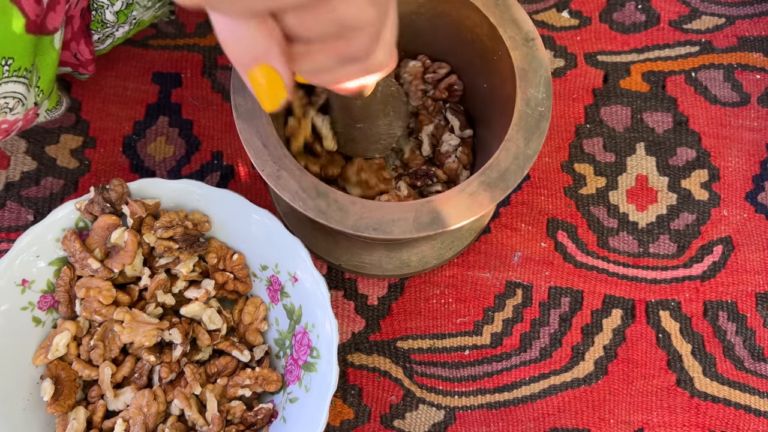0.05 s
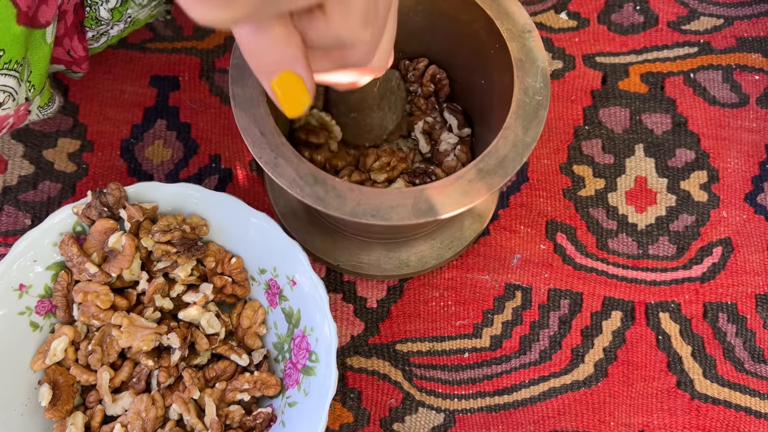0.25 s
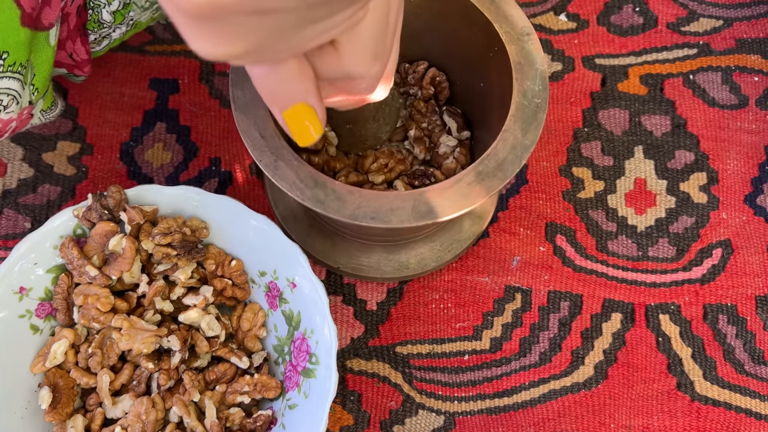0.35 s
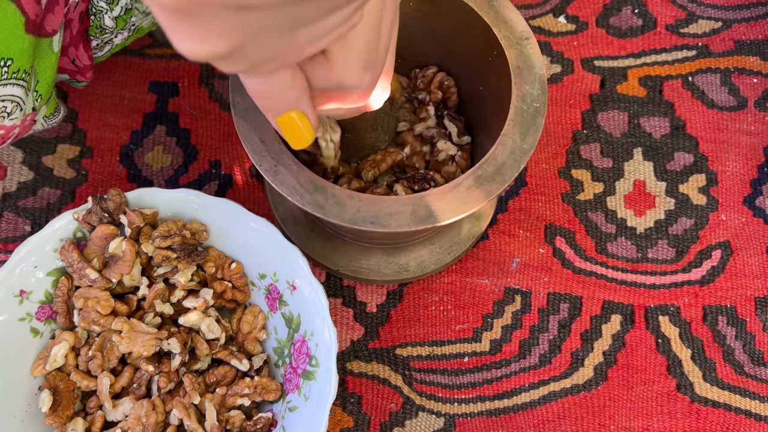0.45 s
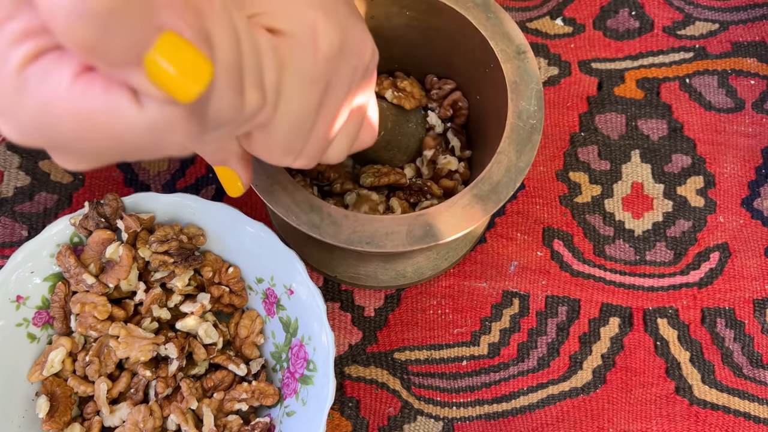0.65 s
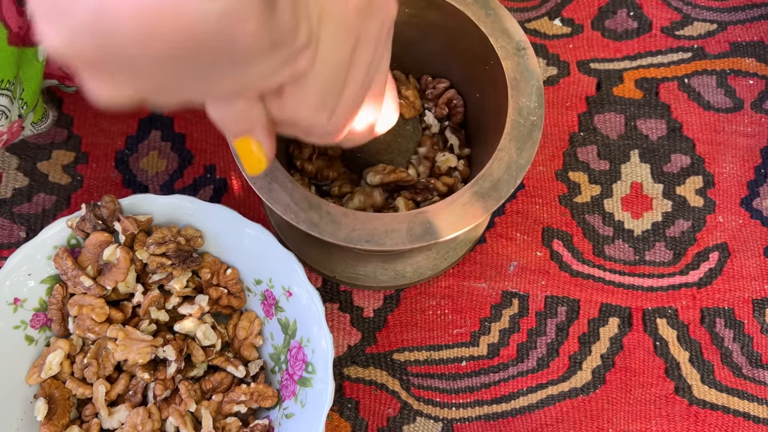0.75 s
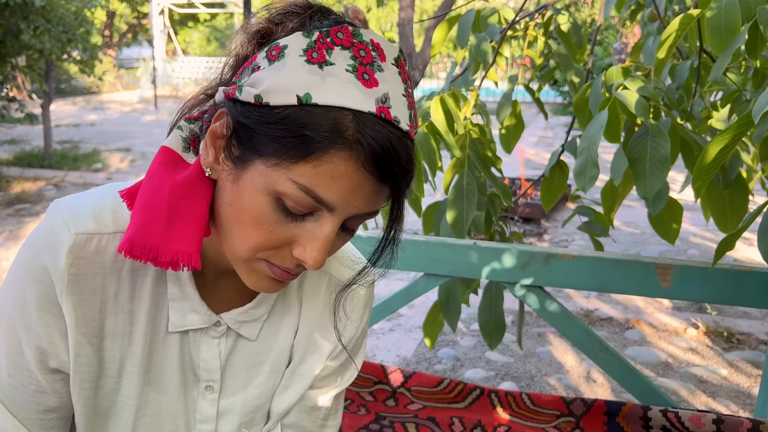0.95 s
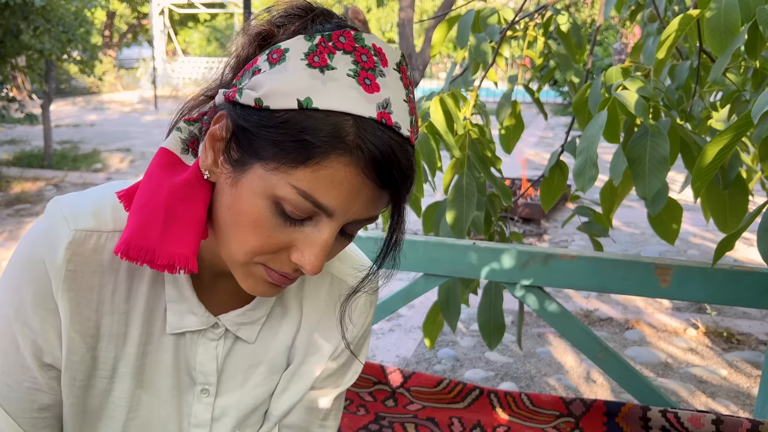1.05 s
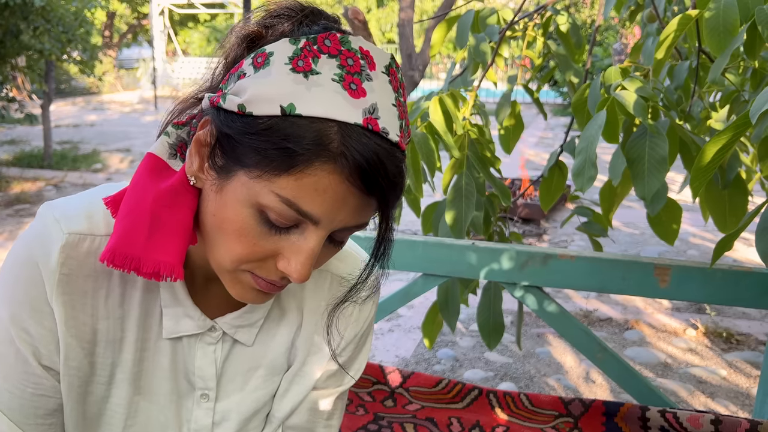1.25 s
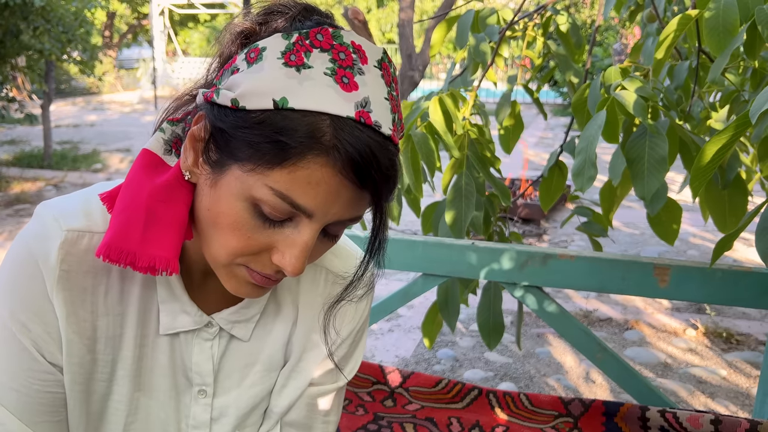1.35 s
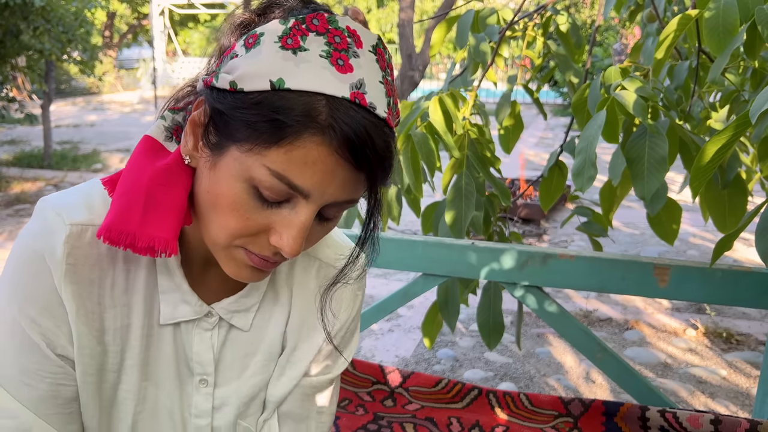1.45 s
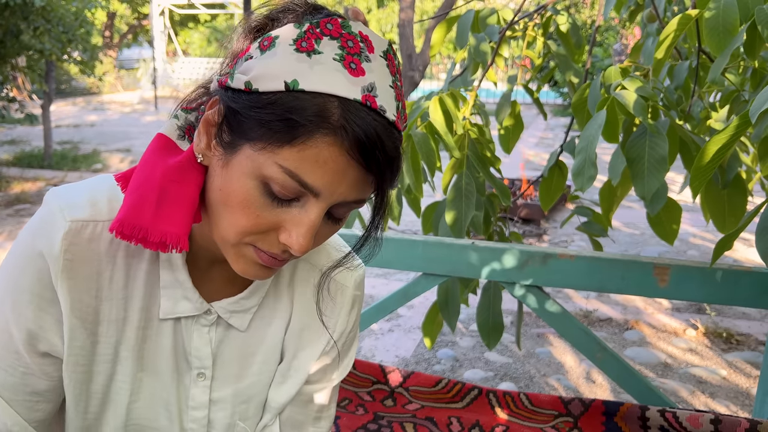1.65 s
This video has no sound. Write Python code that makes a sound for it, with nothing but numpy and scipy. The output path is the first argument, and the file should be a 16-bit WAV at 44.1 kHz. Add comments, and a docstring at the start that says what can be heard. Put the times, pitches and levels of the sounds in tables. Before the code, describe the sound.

A pestle grinds nuts in a brass mortar, close up outdoors: faint taps, one hard ringing clang, dull thumps with dense dry cracking, sharp lighter clinks, then woody knocks over a quiet low rumble.

```python
"""A low rumble and air hiss lie under a pestle working nuts in a brass mortar on a carpet outdoors.
Light wall taps (beating pairs of damped sines) and cracks (swarms of sine grains) come first, then one hard
clang with a noisy chatter at 0.23 s. Dull thumps (low damped sines) start at 0.32 s, many kernels crack
from 0.4 to 0.6 s, and lighter taps with short sharp ticks follow near 0.87 and 0.96 s.
Two groups of wooden knocks (damped sines with a rough chirp) come late, near 1.38 and 1.48 s."""
import sys
import numpy as np
from scipy import signal
from scipy.fft import rfft, irfft, next_fast_len
from scipy.io import wavfile
from scipy.ndimage import map_coordinates

SR = 44100
rng = np.random.default_rng(int(sys.argv[2]) if len(sys.argv) > 2 else 0)


def int16_out(signal):
    """Quantize to a 16-bit WAV file."""
    q = np.round(np.clip(np.atleast_2d(signal).T, -1, 1) * 32767)
    wavfile.write(sys.argv[1], SR, q.astype(np.int16))


def nominal_scale(level):
    """Amplitude ratio for a level in decibels (scalar or array-like)."""
    x = np.asarray(level, float) / 20
    return 10 ** x


N = 74970  # length in samples, 1.7 s


def unit(x):
    """Scale to rms 1."""
    return x / np.sqrt(np.mean(x ** 2) + 1e-20)


def along(points, hz):
    """Read a curve of (Hz, value) points on a logarithmic pitch axis."""
    point_hz, value = np.transpose(points)
    return np.interp(np.log(hz + 1), np.log(point_hz + 1), value)


def over_time(points):
    """Read a curve of (seconds, value) points at every sample."""
    return np.interp(np.arange(N) / SR, *np.transpose(points))


def wobble(rate):
    """A smooth random curve with `rate` random knots a second."""
    knots = rng.standard_normal(int(N * rate / SR) + 4)
    return map_coordinates(knots, [np.arange(N) * rate / SR])


def filtered(x, response):
    """Multiply the spectrum of x by a response that depends on frequency."""
    size = next_fast_len(N + 8192)
    spectrum = rfft(x, size) * response(np.fft.rfftfreq(size, 1 / SR))
    return irfft(spectrum, size)[..., :N]


def rush(spectrum, alike):
    """Stereo noise of rms 1; likeness 1 makes both sides equal, 0 makes them unrelated."""
    def mid_side(hz):
        turn = np.arccos(np.clip(along(alike, hz), -1, 1)) / 2
        return nominal_scale(along(spectrum, hz)) * [np.cos(turn), np.sin(turn)]

    mid, side = filtered(rng.standard_normal((2, N)), mid_side)
    return unit(np.array([mid + side, mid - side]))


def ring(start_s, hz, t60, rise_s, turns=0.):
    """A sine that swells in over rise_s and loses 60 dB in t60 seconds; turns is its starting phase."""
    t = np.maximum(np.arange(N) / SR - start_s, 0)
    wave = np.sin(2 * np.pi * (hz * t + turns))
    return wave * nominal_scale(-60 * t / abs(t60)) * (1 - np.exp(-t / abs(rise_s)))


def grains(start_s, level_db, hz):
    """Many short damped sines, each added at its own time; lower ones last longer."""
    k = np.arange(96)
    cycles = hz[:, None] * k / SR
    decay = np.exp(-3 * cycles / 1.8)  # falls by e cubed in 1.8 cycles
    wave = nominal_scale(level_db)[:, None] * np.sin(2 * np.pi * cycles) * decay
    at = np.clip(np.round(start_s * SR).astype(int)[:, None] + k, 0, N)
    return np.bincount(at.ravel(), wave.ravel(), N + 1)[:N]


# colour of the rumble before scaling to rms 1: pitch_hz [Hz], level_db [dB]
RUMBLE_COLOUR = [(12, -69), (25, -20), (95, 2.5), (180, -11), (300, -15), (450, -17.5), (750, -21.5),
                 (1100, -24.5), (1600, -28.5), (3000, -79)]
# average loudness of the rumble: time_s [s], level_db [dB]
RUMBLE_LEVEL = [(0.0, -53), (0.344, -50.5), (1.182, -55.5), (1.524, -51.5), (1.7, -55.5)]
# how alike the rumble is left and right: pitch_hz [Hz], likeness [0 to 1]
RUMBLE_LIKENESS = [(60, 0.96), (150, 0.87), (300, 0.17), (700, 0.074)]


def rumble():
    """Low noise with a slowly drifting, slightly uneven loudness."""
    level_db = over_time(RUMBLE_LEVEL) + 1.5 * wobble(11.46)
    return nominal_scale(level_db) * rush(RUMBLE_COLOUR, RUMBLE_LIKENESS)


# colour of the hiss before scaling to rms 1: pitch_hz [Hz], level_db [dB]
HISS_COLOUR = [(760, -60.5), (1300, -26), (1800, 2.5), (3000, 2), (5000, 2.5), (8500, 1), (12000, -11),
               (16000, -5.5)]
# how alike the hiss is left and right: pitch_hz [Hz], likeness [0 to 1]
HISS_LIKENESS = [(1500, 0.11), (6000, 0.099), (14000, 0.19)]
# strength of the grinding, shared by hiss and crumbs, which each add 3 dB: time_s [s], level_db [dB]
GRINDING = [(0, -61), (.12, -58), (.21, -59.5), (.34, -59.5), (.45, -58.5), (.62, -54), (.69, -63.5),
            (.80, -62), (.9, -69), (1.03, -68.5), (1.15, -66), (1.27, -68.5), (1.37, -56.5), (1.44, -72),
            (1.55, -60.5), (1.62, -72), (1.7, -75.5)]


def hiss():
    """Airy noise that rises and falls with the grinding and flickers a little."""
    level_db = over_time(GRINDING) + 3 + 1.5 * wobble(40.22)
    return nominal_scale(level_db) * rush(HISS_COLOUR, HISS_LIKENESS)


def yard(x):
    """A short diffuse answer from nearby surfaces: the sound smeared by fading noise."""
    t = np.arange(SR // 5) / SR
    tail = rng.standard_normal((2, len(t))) * nominal_scale(-60 * t / 0.027)  # 60 dB down in 0.027 s
    return signal.fftconvolve(x[None], tail / np.linalg.norm(tail[0]), axes=1)[:, :N]


# the mortar thumps the carpeted floor: start_s [s], level_db [dB], pitch_hz [Hz], t60_s [s to fall 60 dB]
FLOOR_THUMPS = [(0.317, -29, 79, 0.068), (0.427, -22, 154, 0.019), (0.457, -25, 81, 0.093),
                (0.609, -28.5, 79, 0.1), (0.654, -32, 84, 0.093), (0.712, -28, 79, 0.052),
                (1.384, -18.5, 114, 0.03), (1.488, -35, 116, 0.012)]


def thumps():
    """Soft low sines that swell gently and die quickly."""
    return sum(nominal_scale(db) * ring(s, hz, t60, 0.0074) for s, db, hz, t60 in FLOOR_THUMPS)


# wooden knocks: start_s [s], level_db [dB]
WOOD_KNOCKS = [(1.378, -26.5), (1.3852, -32.5), (1.414, -42), (1.469, -47), (1.4843, -35.5)]
# tones in every knock: pitch_hz [Hz], level_db [dB, added to the knock], t60_s [s to fall 60 dB]
WOOD_TONES = [(713, 0.5, 0.04), (787, -1.5, 0.025), (1202, -6.5, 0.025), (191, -2.5, 0.034)]
# rough chirps around the knocks: middle_s [s], level_db [dB]
KNOCK_CHIRPS = [(1.384, -42.5), (1.484, -49.5)]


def wooden_knocks():
    """Each knock sounds a few short wooden tones; two bursts of narrow noise roughen them."""
    t = np.arange(N) / SR
    chirp_hz, width_hz, length_s = 4100, 320, 0.0088
    wood = np.zeros(N)
    for s, db in WOOD_KNOCKS:
        for hz, level_db, t60 in WOOD_TONES:
            wood += nominal_scale(db + level_db) * ring(s, hz, t60, 0.0018)
    noise = rng.standard_normal(N)
    chirp = unit(filtered(noise, lambda hz: np.exp(-((hz - chirp_hz) / width_hz) ** 2)))
    bursts = sum(nominal_scale(db) * np.exp(-((t - s) / length_s) ** 2) for s, db in KNOCK_CHIRPS)
    return wood + chirp * bursts


# kernels cracking: start_s [s], swarm_db [dB], snap_db [dB over the swarm, before fixed offsets],
# spread_s [s, scatter of the splinters], pitch_hz [Hz, middle of the scatter]
KERNEL_CRACKS = [(.030, -42, -7, .004, 3820), (0.054, -37, 12, 0.0049, 8740),
                 (0.1027, -41.5, 8, 0.0016, 11400), (0.378, -43.5, 3, 0.001, 14200),
                 (0.395, -50, 21, 0.002, 10200), (0.413, -37.5, 7, 0.013, 7970),
                 (0.418, -28, 14, .004, 9400), (0.478, -49, 5, 0.0018, 10000),
                 (0.497, -62, -4, 0.0026, 11000), (0.529, -48, 7, .003, 10800),
                 (0.5477, -38.5, 13.5, 0.0023, 12100), (0.5552, -39, -5, 0.002, 11300),
                 (0.5612, -32, 22, 0.003, 11000), (0.5732, -47, 22.5, 0.00068, 12200),
                 (0.5925, -38.5, 15.5, 0.0034, 10500), (0.66, -36, 17.5, 0.0031, 8100),
                 (0.804, -48, 11, 0.0043, 2450), (1.0742, -38.5, -9, 0.0038, 6500),
                 (1.122, -45.5, 13, 0.0079, 11100), (1.144, -52, 3, 0.0039, 5970),
                 (1.166, -47, 8, 0.0021, 6170), (1.209, -51, 3, 0.0022, 4660),
                 (1.2576, -48.5, 1, 0.0017, 9100), (1.640, -54, 7.5, 0.004, 8800)]


def cracks(count=70):
    """A breaking kernel gives one sharp snap, four grains close together, in a swarm of splinters."""
    start_s, swarm_db, snap_db, spread_s, middle_hz = (c[:, None] for c in np.transpose(KERNEL_CRACKS))
    late, pitch, size = rng.standard_normal((3, len(KERNEL_CRACKS), count))
    splinter = np.arange(count) > 3
    when = start_s + np.abs(late) * np.where(splinter, spread_s, 0.00015)
    level_db = swarm_db + np.where(splinter, 6 * size - 2, snap_db - 6)
    level_db = level_db + 1.8 * pitch  # higher grains are louder
    hz = np.clip(middle_hz * np.exp(0.6 * pitch), 900, 15000)
    return grains(when.ravel(), level_db.ravel(), hz.ravel())


def crumbs(count=900):
    """Small crumbs snap at random times, as loud as the grinding makes them; a few are much louder."""
    when, tone, big = rng.random((count, 3)).T
    when_s = when * N / SR
    level_db = np.interp(when_s, *np.transpose(GRINDING)) + 3 - 4 * np.log(big)
    return grains(when_s, level_db, 3000 * 4.9 ** tone)


# short sharp ticks: start_s [s], level_db [dB]
SHARP_TICKS = [(0.8696, -28.5), (0.9612, -35.5), (0.9698, -19)]


def ticks():
    """Each tick is one very short damped sine at 2440 Hz."""
    start_s, level_db = np.transpose(SHARP_TICKS)
    return grains(start_s, level_db, 2440 + 0 * start_s)


def crunch():
    """Cracks and crumbs lose their lows below about 1330 Hz; the ticks stay whole."""
    nuts = cracks() + crumbs()
    return filtered(nuts, lambda hz: (1j * hz / (1330 + 1j * hz)) ** 2) + ticks()


# colour of the chatter before scaling to rms 1: pitch_hz [Hz], level_db [dB]
CHATTER_COLOUR = [(150, -100), (280, -16), (600, -6.5), (1200, -11), (2000, -12), (3000, -16.5),
                  (5000, -23), (9000, -20.5), (12000, -38.5), (16000, -38.5)]
# lowest wall tone while the pestle leans on it: pitch_hz [Hz], level_db [dB, left],
# t60_s [s to fall 60 dB], end_s [s after the start, sign ignored; the tone has faded by then]
FADING_RING = (1175.5, -14.5, 0.22, -0.66)


def chatter():
    """The pestle stays on the wall after the hard blow: rough noise and one quickly fading ring."""
    start_s, slow_s, fast_t60 = 0.2335, 0.059, 0.0096
    t = np.arange(N) / SR - start_s
    # a fall of 220 dB a second at first, then a much faster one
    fall_db = -220 * np.clip(t, 0, slow_s) - 60 * np.maximum(t - slow_s, 0) / fast_t60
    shape = (t > 0) * nominal_scale(fall_db + 0.67 * wobble(160))
    noise = nominal_scale(-29.5) * shape * rush(CHATTER_COLOUR, [(1000, 0.28)])
    hz, db, t60, end_s = FADING_RING
    ending = 1 / (1 + np.abs(t / end_s) ** 8)
    return noise + nominal_scale([[db], [db - 3.5]]) * ring(start_s, hz, t60, 0.0052) * ending


# wall tones come in split pairs: lower_hz [Hz], split_hz [Hz from lower to upper]
WALL_PAIRS = [(1162.5, 11.3), (2724.5, 12.2), (4095, 6.5), (4929, 15), (5614, 13), (6536, 9), (6748, 9),
              (7074, 8), (7865, 9), (8431, 12), (11760, 12), (12492, 9)]
# for each pair: level_db [dB], t60_s [s to fall 60 dB], upper_db [dB, upper over lower],
# left_db [dB, left over right, before the extras]
WALL_RING = [(0.5, 0.79, 0.5, 8.5), (3.5, 0.83, -1, 9), (-8, 0.68, 8.5, 12.5), (2.5, 0.35, -12.5, 11),
             (-7, 0.45, -1.5, 8), (-1.5, 0.24, -12.5, 10.5), (-23.5, 0.17, 8.5, -8.5),
             (-8.5, 0.24, -22, 18.5), (-21.5, 0.16, -9, -14), (-8, 0.092, 9.5, 9), (-31.5, 0.27, 1, 2.5),
             (-23.5, 0.27, -26, 7)]
# swing direction for each pair: upper [+1 or -1], right side of lower [+1 or -1], right side of upper [+1 or -1]
WALL_SIGNS = [(1, 1, -1), (-1, -1, -1), (-1, 1, 1), (-1, 1, 1), (-1, -1, -1), (-1, 1, 1)] + 6 * [(1, 1, 1)]
# extra left lean of the upper partner: lowest pair [dB], second pair [dB]
UPPER_LEAN = (-1.5, 7)
# blows on the wall: start_s [s], level_db [dB], tilt_db [dB per octave],
# three leans to the upper partner [dB: lowest pair, second, higher],
# three starts of the beat [turns: lowest pair, second, higher],
# two extra left leans [dB: lowest pair, others], build_s [s, build-up of all but the lowest pair]
WALL_BLOWS = [(0.032, -53, 0.5, -2, 1, -0.5, -0.055, .01, .01, -6, -4, 0.0038),
              (0.122, -51, -19, -4, 16, 20, 0.7, .01, .01, -9, -26, .003),
              (0.234, -24.5, 1.66, 3.5, -8, 1.2, 0.095, 0.61, 0.0056, -1.8, -4, 0.027),
              (0.658, -57.5, 2.5, 9, 23, 24, 0.38, 0.0089, .01, 5, 18, 0.0012),
              (0.8671, -48, -7, -7, 20, -1, -0.098, .01, 0.0086, -7.5, -10.5, 0.001),
              (0.9612, -30.5, -9.5, 0.5, 20, 1.5, -0.34, 0.59, 0.38, 1.5, 5.5, 0.00034),
              (1.543, -71.5, 7.5, -12, -18, -15.5, 1, .01, 0.0095, 8, 23, 0.0035)]
# the pestle sinks into the nuts and changes the ring: start_s [s], second_db [dB lost by the second pair,
# a negative loss is a gain], higher_db [dB per octave lost by higher pairs]
NUT_PRESSES = [(0.418, 2, 4), (.556, 4, 6), (1.065, -4, 2)]


def press_loss(blow_s):
    """Pressing into the nuts changes tones already ringing: loss of the second and of the higher pairs."""
    t = np.arange(N) / SR
    loss_db = np.zeros((2, N))
    for press_s, second_db, higher_db in NUT_PRESSES:
        if press_s > blow_s:
            loss_db += np.outer([second_db, higher_db], np.clip((t - press_s) / 0.0033, 0, 1))
    return loss_db


def mortar():
    """Every blow rings both partners of each wall tone; they beat and radiate unevenly to the two sides."""
    out = np.zeros((2, N))
    for s, db, tilt, *shape, left_low, left_high, build_s in WALL_BLOWS:
        second_db, higher_db = press_loss(s)
        for k, (pair, signs, tone) in enumerate(zip(WALL_PAIRS, WALL_SIGNS, WALL_RING)):
            hz, split_hz = pair
            upper_sign, right_low, right_up = signs
            level_db, t60, upper_db, left_db = tone
            octaves = np.log2(hz / WALL_PAIRS[0][0])
            group = min(k, 2)  # lowest pair, second pair, higher pairs
            lean_db, turns = shape[group], shape[3 + group]
            rise_s = build_s if k else 0.00053
            lower = nominal_scale(min(-lean_db, 0)) * ring(s, hz, t60, rise_s)
            upper = ring(s, hz + split_hz, t60, rise_s, turns)
            upper = nominal_scale(upper_db + min(lean_db, 0)) * upper_sign * upper
            right = right_low * lower + right_up * upper * nominal_scale(-(*UPPER_LEAN, 0)[group])
            right = right * nominal_scale(-left_db - (left_high if k else left_low))
            lost_db = (0, second_db, higher_db * octaves)[group]
            out += nominal_scale(db + level_db + tilt * octaves - lost_db) * np.array([lower + upper, right])
    return out


def scene():
    """Close sounds reach the left side 0.15 ms earlier and a little louder."""
    low, wood, nuts = thumps(), wooden_knocks(), crunch()
    close = nuts * nominal_scale([[.8], [-.8]]) + low * nominal_scale([[.6], [-.6]]) + wood * nominal_scale([[.9], [-.9]])
    shift_s = np.array([[-0.000075], [0.000075]])
    close = filtered(close, lambda hz: np.exp(-2j * np.pi * hz * shift_s))
    return rumble() + hiss() + nominal_scale(-5) * yard(nuts + wood) + close + chatter() + mortar()


def band_limit(x):
    """A steep low-pass at the top of the band."""
    return signal.sosfilt(signal.butter(12, 17000, fs=SR, output="sos"), x)


# overall treble colour: pitch_hz [Hz], gain_db [dB]
TREBLE_COLOUR = [(8800, 2.5), (9700, 2), (10400, -3), (11300, 10.5), (12800, 7.5), (13800, -11), (14600, 6),
                 (15800, 13.5), (16300, -41), (17000, -79)]


def record(dry):
    """Overall treble colour: two dips and a steep cut at the very top."""
    mix = filtered(dry, lambda hz: nominal_scale(along(TREBLE_COLOUR, hz)))
    return band_limit(mix)


dry = scene()
out = record(dry)
int16_out(out)
```